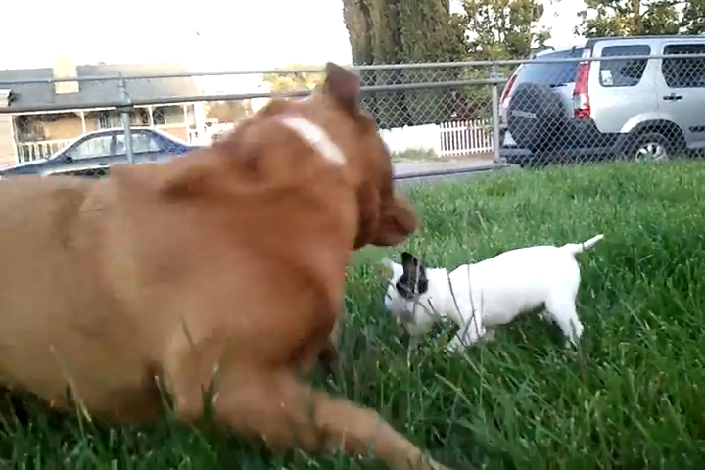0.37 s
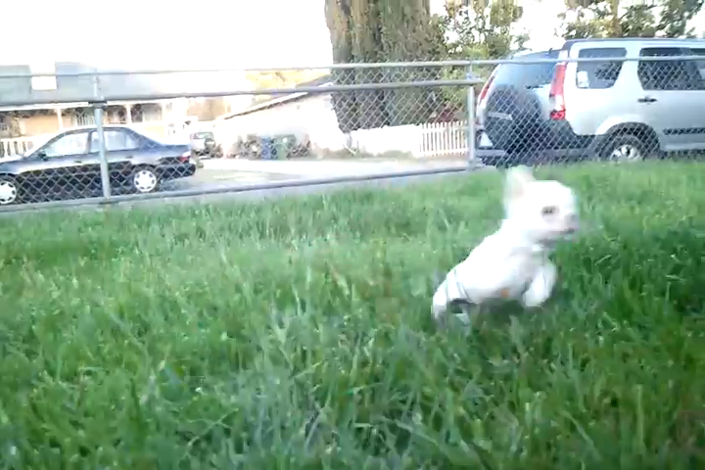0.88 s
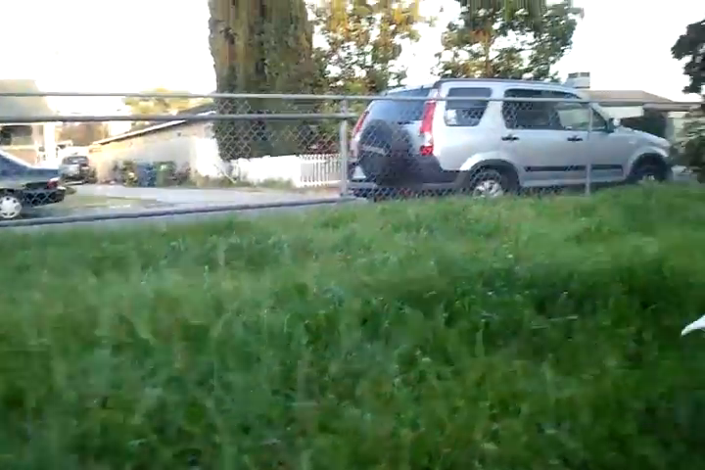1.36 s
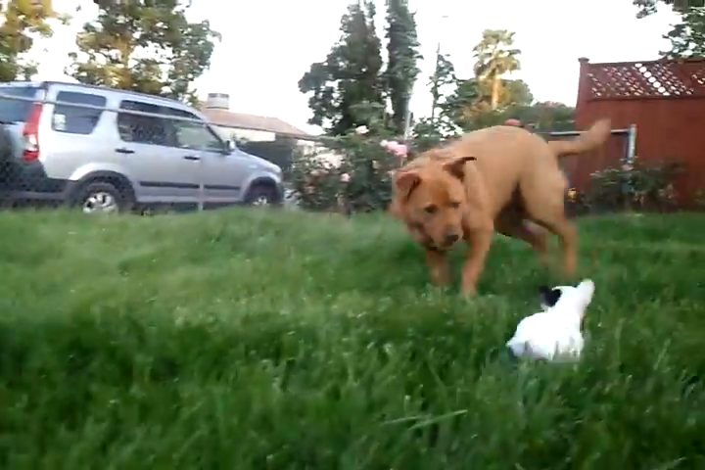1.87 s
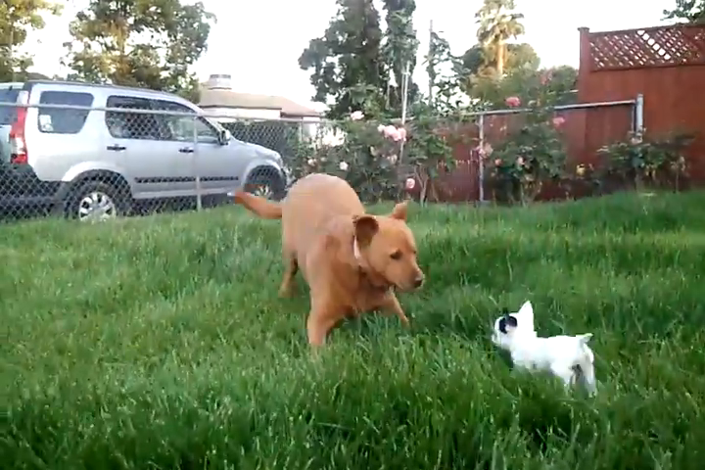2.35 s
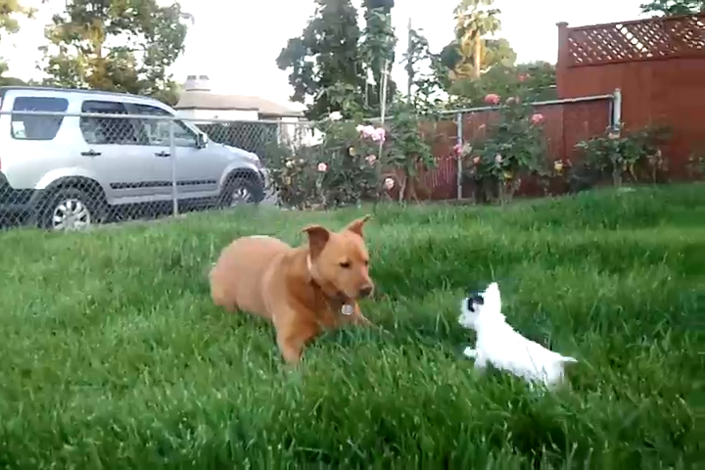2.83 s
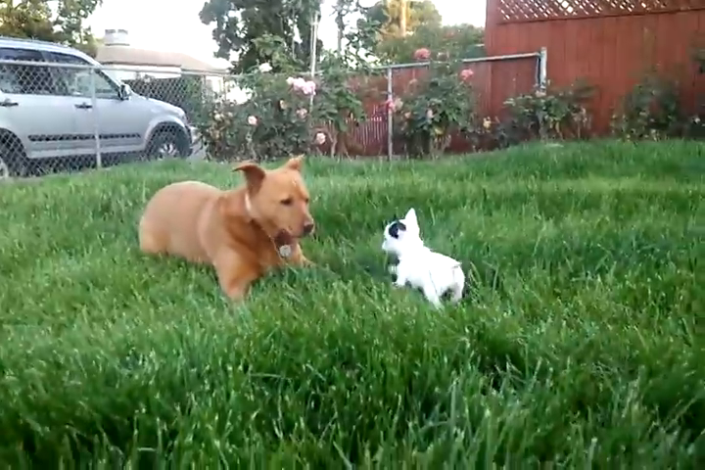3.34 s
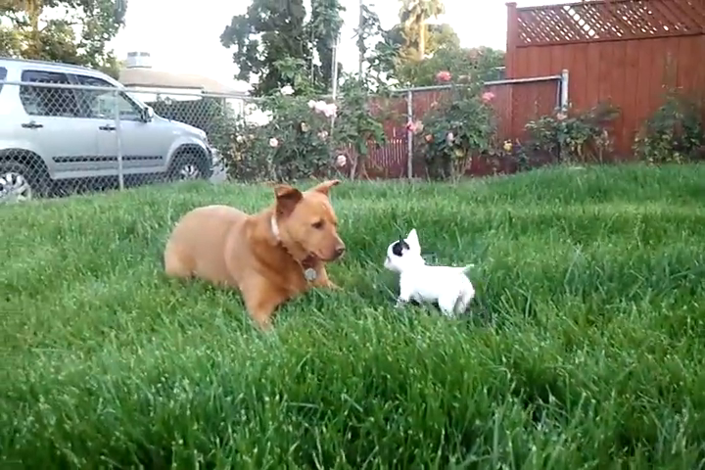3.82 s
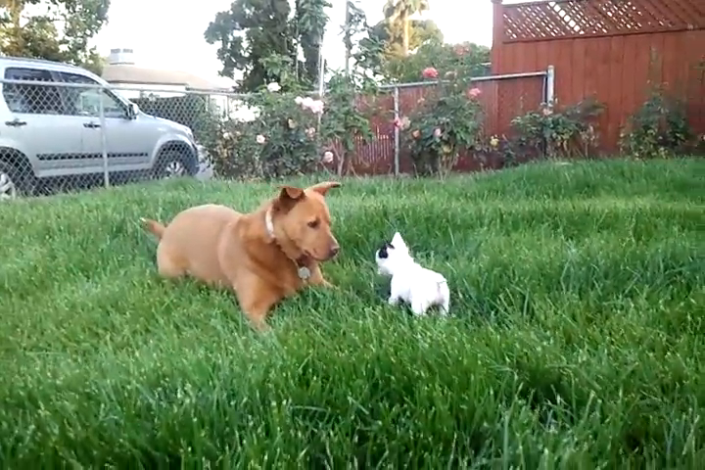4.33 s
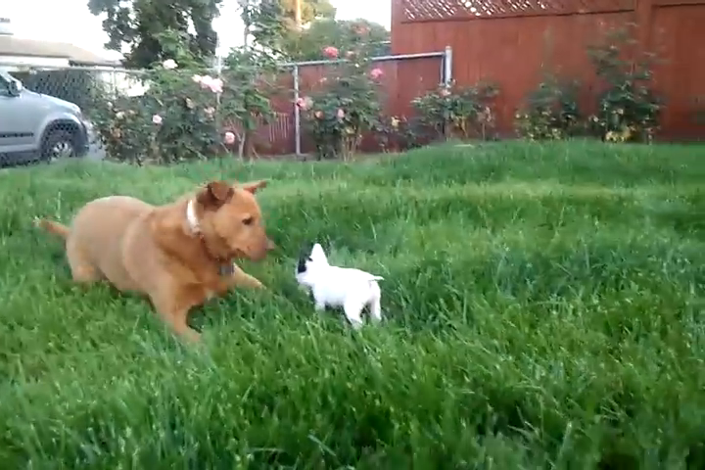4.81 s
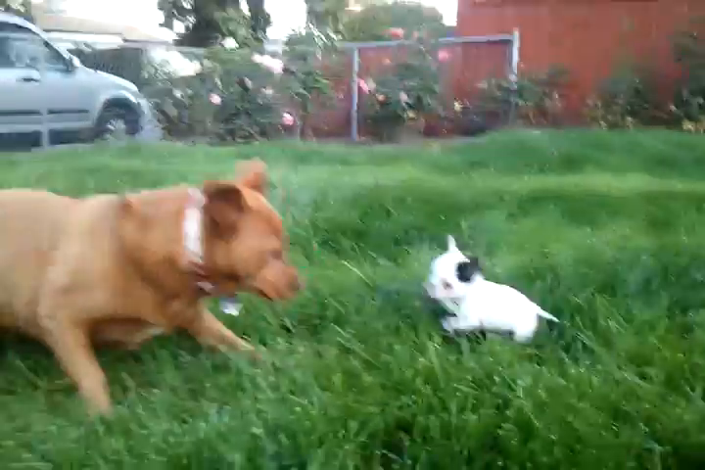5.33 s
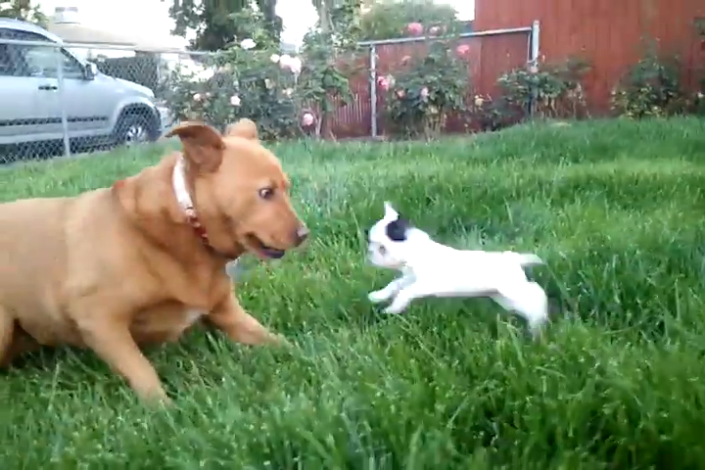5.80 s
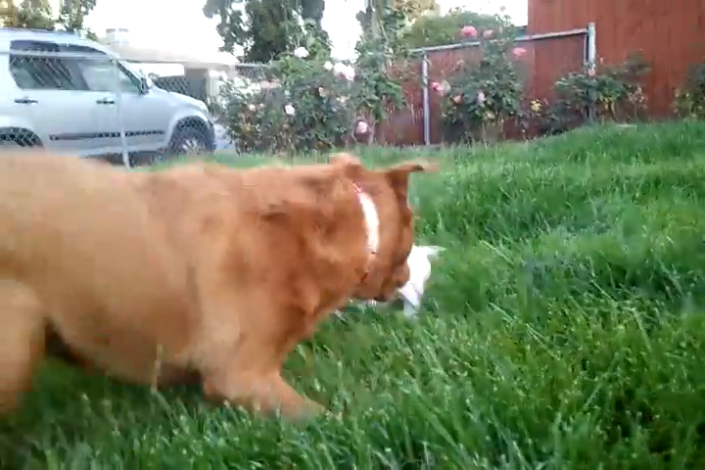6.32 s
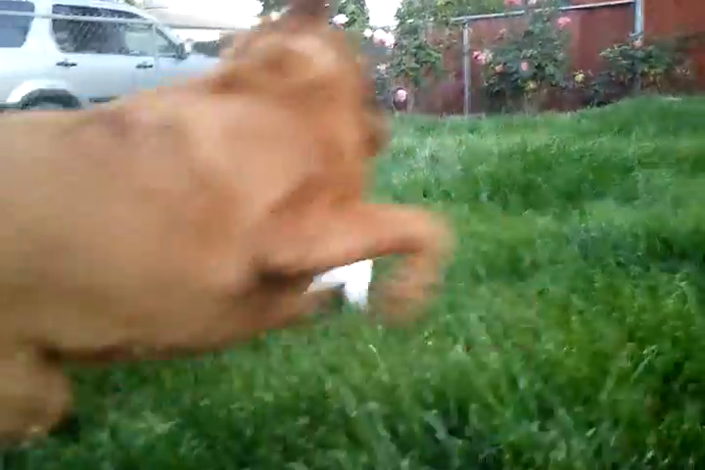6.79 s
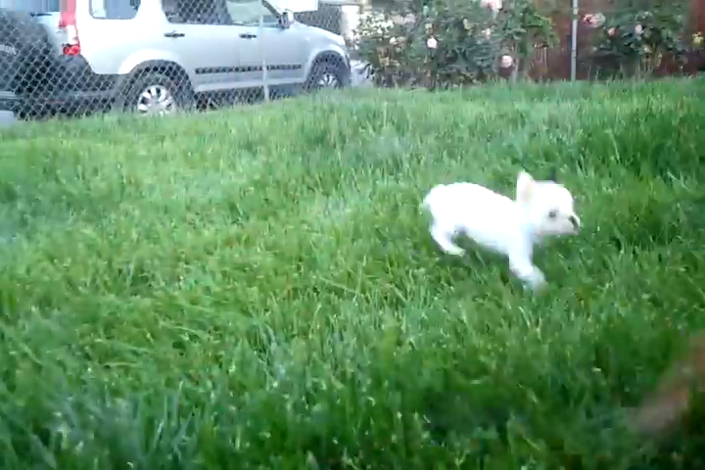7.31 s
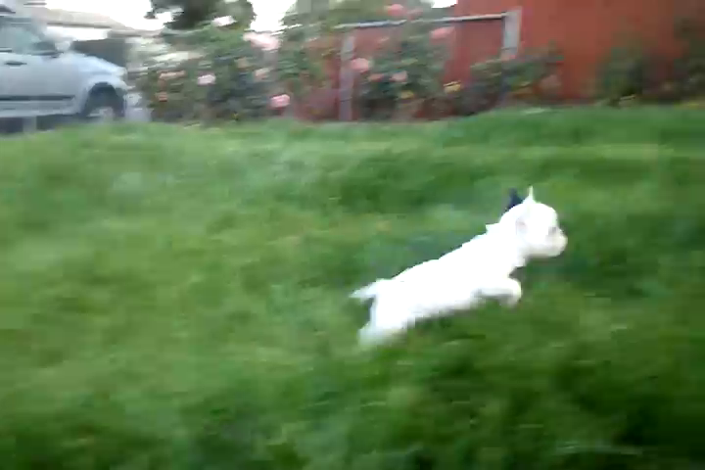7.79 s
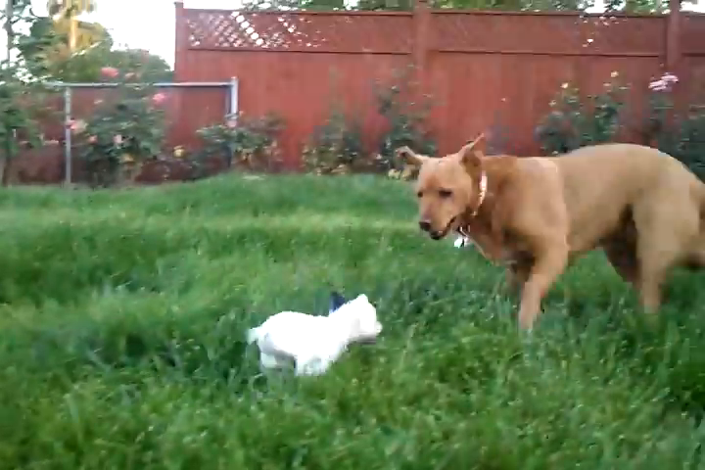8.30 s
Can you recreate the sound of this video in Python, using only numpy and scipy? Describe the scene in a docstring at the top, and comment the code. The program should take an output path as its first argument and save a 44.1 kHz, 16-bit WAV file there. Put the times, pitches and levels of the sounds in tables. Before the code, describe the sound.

Dogs romp through tall grass close to the microphone, crisp swishes and snapping stems mixed with jingling collar tags and soft paw thuds.

```python
"""Two dogs romp in tall grass close to a small microphone in a back yard.
Blades, stems and tips swish as filtered crackling noise; snapping stems and landing paws are bursts of noise.
A hollow tag knocks and metal clinks on the collar, each blow a set of decaying sine modes.
Behind them lie jolts of deep noise, hushed air, the hum of far traffic, a faint whine and one bird whistle.
"""
import sys
import numpy as np
from scipy import signal
from scipy.fft import rfft, irfft, next_fast_len
from scipy.io import wavfile
from scipy.ndimage import uniform_filter1d

SR = 44100
rng = np.random.default_rng(int(sys.argv[2]) if len(sys.argv) > 2 else 0)


def to_linear_factor(level_db):
    """Convert decibel levels (scalar or array-like) to linear amplitude factors."""
    exponent = np.asarray(level_db, float) / 20
    return 10 ** exponent


def dump_mix(stems):
    """Bounce the given channels to the path in sys.argv[1] as a 16-bit WAV at rate SR."""
    frames = np.atleast_2d(stems).T  # one column per channel
    limited = np.clip(frames, -1, 1)  # hard clip at full scale
    pcm = np.round(limited * 32767).astype(np.int16)
    wavfile.write(sys.argv[1], SR, pcm)


N = 371224

# Colour of the air noise: (frequency [Hz], relative level [dB])
AIR_COLOUR = [(250, -25), (420, -4.5), (458, -6), (488, -2.5), (2160, -6.5), (7510, -17), (8300, -21.5),
              (10800, -47), (18300, -120)]
# Colour of the far traffic: (frequency [Hz], relative level [dB])
TRAFFIC_COLOUR = [(30, -41), (60, -9), (130, 0.5), (250, -7), (400, -13), (700, -49)]
# Slow level wander of the low background noise: (time [s], level [dB])
TRAFFIC_LEVEL = [(0.0, -56), (0.3, -54.5), (0.7, -55.5), (1.17, -51.5), (1.43, -53.5), (1.78, -51),
                 (2.04, -52.5), (2.76, -50.5), (3.21, -51.5), (3.68, -50.5), (4.71, -53), (5.44, -51),
                 (6.12, -54), (7.43, -52), (7.8, -56), (8.42, -50.5)]
# Far bird: (start [s], length [s], first pitch [Hz], last pitch [Hz], level [dB])
BIRD_CHIRP = (.012, .035, 7050, 6300, -52)
# Faint fuzzy whine far off: (time [s], pitch [Hz], level before the waver [dB])
WHINE_LINE = [(5.8, 1690, -66), (5.85, 1710, -54), (5.95, 1780, -52), (6.07, 1800, -53), (6.11, 1790, -66)]
# Colour of the jolts: (frequency [Hz], relative level [dB])
JOLT_COLOUR = [(12, -8), (25, -6.5), (45, 4), (90, 0), (160, -22.5), (300, -51)]
# Jolts of the ground and the hand reaching the microphone: (peak time [s], level [dB], half length [s])
JOLTS_FELT = [(.54, -55, .1), (0.763, -48.5, .07), (.89, -48, .08), (1.17, -56.5, .1), (1.378, -56, .07),
              (1.596, -30, 0.013), (1.82, -60, 0.13), (2.4, -60, .08), (2.603, -55, 0.045),
              (2.83, -58, .07), (5.29, -54, .06), (5.65, -64, .06), (5.838, -58, .06), (6.14, -64, 0.13),
              (6.45, -62, 0.079), (6.63, -52, 0.042), (7.176, -46, 0.06), (7.43, -65, 0.11),
              (7.81, -45, .035), (7.96, -39, .04), (8.09, -48, .05), (8.255, -51.5, 0.11)]
# Paws landing: (time [s], peak level [dB], centre frequency [Hz])
PAW_THUDS = [(0.782, -18, 500), (0.809, -37, 148), (1.465, -27.5, 403), (1.581, -22, 490),
             (2.398, -44, 108), (4.425, -39, 223), (5.232, -30, 400), (5.297, -32, 101),
             (5.322, -25.5, 390), (7.808, -35, 106), (7.955, -17.5, 385), (8.083, -26.5, 417)]
# Stems snapping: (time [s], bright crack before trim [dB], duller body before trim [dB])
STEM_SNAPS = [(0.6431, -9, -40), (0.6482, -12.5, -31), (0.6725, -7, -30), (0.678, -9, -37),
              (0.8113, -3, -9.5), (0.8684, -14, -35), (0.9984, -25, -36), (1.1767, -23, -38),
              (1.4657, -17, -45), (1.5908, -18, -13.5), (1.6838, -26, -25), (2.3092, -22, -30),
              (2.36, -28, -33), (2.6209, -22, -46), (2.753, -20, -37), (2.8389, -26, -36),
              (4.4306, -52, -39), (5.2314, -30, -26), (5.277, -22, -40), (5.293, -22, -25),
              (5.3214, -29, -42), (5.36, -11, -42), (5.637, -20, -42), (5.7069, -22, -43),
              (6.1426, -13.5, -32.5), (6.4944, -7, -37), (6.618, -21, -35), (6.8687, -13, -49),
              (7.0735, -22, -40), (7.1635, -18, -27), (7.3308, -9, -38), (7.764, -25, -29),
              (7.8112, -13.5, -27), (7.9445, -15, -15), (8.159, -24, -40), (8.1817, -24, -40),
              (8.233, -17, -38), (8.3699, -25, -29)]
# Hollow tag knocking on the collar, levels before its layer gain:
# (time [s], first mode group [dB], second [dB], third [dB], main pitch [Hz])
TAG_KNOCKS = [(0.5561, -24, -30, -25, 1020), (.567, -55, -31.5, -36, 973), (.6198, -41, -37, -42, 950),
              (.732, -36, -40, -38, 940), (.7468, -26, -41, -36, 1010), (0.7827, -27, -27, -26, 950),
              (0.792, -27, -22, -31, 980), (.8093, -36, -33, -28, 914), (0.908, -49, -34, -34, 1083),
              (.9979, -55, -34, -47, 1066), (1.18, -30.5, -37, -31.5, 1043), (1.3592, -33, -39, -47, 1050),
              (1.3664, -40, -32.5, -55, 1047), (1.3984, -53, -43, -66, 1080), (1.4656, -34, -39, -51, 1070),
              (1.4984, -54, -38, -44.5, 1045), (1.5745, -46, -26, -29.5, 986),
              (1.5868, -22, -28.5, -35, 1013), (1.722, -46, -56, -38.5, 1000),
              (1.743, -42, -34.5, -48, 1010), (1.8185, -46, -40, -52, 960), (2.308, -53, -48, -42, 1040),
              (2.339, -56, -52, -40, 1010), (2.36, -60, -49, -41, 1000), (2.4014, -47, -50, -44, 990),
              (2.6221, -39.5, -58, -43.5, 1000), (2.7278, -54, -35.5, -59, 997),
              (2.753, -24, -28, -32, 1020), (2.824, -44, -42, -47, 986), (2.8402, -40, -40, -50, 980),
              (2.8864, -57, -47, -42, 990), (2.9643, -42, -45, -60, 960), (3.0287, -63, -46, -55, 995),
              (5.3561, -57, -55, -45, 1000), (5.4482, -55, -33.5, -60, 990), (5.4612, -37, -39.5, -51, 935),
              (5.602, -63, -40.5, -48, 1000), (5.7074, -43, -42.5, -35.5, 980),
              (5.9803, -56, -45.5, -53, 990), (6.1191, -54, -40, -46, 1000), (6.147, -42, -43, -34.5, 990),
              (6.226, -43, -58, -54, 1000), (6.6272, -39, -40, -39, 993), (6.7712, -42, -52, -47, 1010),
              (6.8782, -59, -46, -39, 1015), (7.2735, -57, -35, -56, 992), (7.2861, -35, -39, -36.5, 976),
              (7.5716, -59, -40.5, -45, 1090), (7.673, -63, -39, -50, 1010),
              (7.7242, -34.5, -32.5, -55, 1036), (7.7343, -38, -43, -44, 1030),
              (7.7646, -54, -45, -40, 1020), (7.7972, -56, -40, -59, 920), (7.8113, -36, -34, -28.5, 940),
              (7.9108, -42, -47, -49, 1040), (7.9252, -28, -49, -32.5, 1000),
              (7.942, -22.5, -23, -33, 1020), (7.9546, -17, -15.5, -21, 948), (7.993, -24.5, -36, -32, 980),
              (8.0839, -34.5, -34, -32.5, 1023), (8.0946, -53, -47, -32.5, 1000),
              (8.1604, -45, -36, -54, 1035), (8.1814, -39, -27, -48, 1020), (8.1914, -28.5, -28, -50, 980),
              (8.2325, -24.5, -25.5, -40, 1008), (8.2684, -60, -34.5, -43, 1030),
              (8.3833, -53, -31.5, -56, 1010), (8.394, -31.5, -36, -39, 1023)]
# How long the hollow tag swings clear of the fur: (time [s], free time [s])
KNOCK_FREE_TIME = [(0, .018), (.7, 0.012), (.75, 0.042), (.8, .015), (.9, 0.031), (1.0, 0.013),
                   (1.2, 0.034), (1.5, 0.035), (1.56, 0.015), (2.7, 0.025), (5.4, 0.024), (7.9, 0.018),
                   (8.2, 0.017), (8.27, 0.15), (8.42, 0.027)]
# Hollow tag, three groups of modes: (frequency [Hz], relative level [dB], base t60 [s])
HOLLOW_MODES = [
    [(596, -5, 0.085), (686, -8, 0.026), (784, -13.5, 0.032), (3300, -14, .07), (3260, -17.5, .07)],
    [(1000, -1.5, 0.14), (950, -12, .1), (2930, -11, 0.11)],
    [(1858, -1, 0.075), (1907, -2.5, 0.1), (2700, -17, 0.065)],
]
# Metal tag and ring clinking, levels before their layer gain:
# (time [s], first mode group [dB], third [dB], fourth [dB], time until touched again [s])
METAL_CLINKS = [(.5566, -29, -44, -23.5, 0.0084), (0.621, -51, -35, -46, .02), (.752, -50, -41, -35, .02),
                (0.7888, -29, -19.5, -27, 0.007), (0.808, -32, -16.5, -24, 0.0058),
                (.998, -36, -45, -35, 0.038), (1.173, -37, -45, -52, .008), (1.348, -49, -49, -31, .0099),
                (1.3536, -24.5, -33, -31.5, .05), (1.3638, -34, -32, -46, .079),
                (1.4645, -40, -30.5, -30, 0.034), (1.49, -34, -42, -40, 0.023),
                (1.568, -34, -48, -46, .008), (1.575, -41, -22.5, -20, 0.0048),
                (1.5901, -32, -28, -23, 0.015), (1.6088, -47, -37, -36, 0.012),
                (1.7418, -42, -56, -47, 0.01), (1.818, -29.5, -43, -44, 0.02),
                (1.834, -46, -45, -48, 0.019), (2.0964, -59, -41.5, -58, 0.03),
                (2.264, -45, -50, -42, 0.057), (2.587, -33, -46, -51, 0.038), (2.621, -53, -43, -46, .012),
                (2.727, -43, -43, -37, .017), (2.7533, -26, -35, -39, 0.019),
                (2.7762, -58, -44, -36, 0.033), (2.7884, -48, -34, -44, 0.01),
                (2.8462, -43, -49, -37.5, 0.038), (2.914, -29, -45, -50, 0.022),
                (5.233, -47, -35.5, -41, .02), (5.293, -30, -50, -55, .01), (5.3883, -45, -42, -60, 0.041),
                (5.447, -32, -38, -50, 0.022), (5.455, -60, -59, -46, 0.067), (5.5608, -39, -44, -53, .01),
                (5.6, -39, -51, -54, .009), (5.708, -48, -40, -60, 0.015), (5.88, -40.5, -52, -67, 0.022),
                (5.92, -43, -50, -64, .015), (5.9802, -39, -60, -64, 0.017), (5.985, -59, -60, -54, 0.067),
                (6.119, -46, -55, -62, .014), (6.146, -55, -38.5, -50, .08), (6.225, -36.5, -57, -57, .013),
                (6.757, -51, -43, -50, 0.022), (6.879, -39, -47, -50, .01), (7.2291, -44, -43, -32, .038),
                (7.2755, -51, -36, -47, .024), (7.283, -42, -35, -33, 0.023),
                (7.5676, -35, -32.5, -47, 0.026), (7.67, -57, -38, -34.5, 0.021),
                (7.724, -61, -35.5, -29, 0.016), (7.763, -34, -35.5, -38, .008),
                (7.793, -55, -48, -36, 0.017), (7.8182, -51, -28.5, -38, 0.016),
                (7.9117, -40, -52, -60, .01), (7.9435, -37, -25, -31, 0.024),
                (7.9556, -17.5, -32, -38, .012), (7.9642, -13, -29, -26, 0.0078),
                (7.9916, -27.5, -30, -45, .012), (8.085, -29, -38, -41, 0.027),
                (8.1574, -34.5, -40, -55, 0.0076), (8.2311, -35.5, -38, -49, .064),
                (8.2685, -36, -46, -48, .014), (8.287, -41, -41, -50, .014),
                (8.3025, -31.5, -40, -50, .013), (8.316, -33.5, -55, -51, 0.0082),
                (8.377, -37, -37, -49, 0.032)]
# Metal tag and ring, four groups of modes: (frequency [Hz], relative level [dB], base t60 [s])
METAL_MODES = [
    [(4570, -6, .08), (4625, -1, .11), (4730, -11, .05), (3950, -15, .05)],
    [(5370, -3, .1), (5780, -3, .08), (6300, -8, .08)],
    [(6820, -12, .08), (7180, 0, .28), (7285, -9, .12), (8890, -3, .25)],
    [(7825, -1, .25), (8175, -2, .25)],
]
# Colours of blades, heavy stems and fine tips: (frequency [Hz], relative level [dB])
BLADE_COLOUR = [(1500, -11.5), (2200, -7.5), (3000, -4.5), (4300, -2.5), (5200, -4), (6200, -7),
                (7500, -49)]
STEM_COLOUR = [(30, -27), (100, -7), (300, 2.5), (900, 3), (1500, 2.5), (2400, -2), (3500, -33)]
TIP_COLOUR = [(3500, -25.5), (5000, -7), (6000, -3), (7100, 0.5), (8000, -5.5), (9300, -8.5)]
# Restless stirring of the grass between strokes, before the layer gains:
# (time [s], level [dB], heavy stems relative [dB], fine tips relative [dB])
GRASS_STIR = [(0, -64, -2, 0), (.385, -73, -4, 3), (.4, -47, -14, -1), (.6, -46.5, -8.5, 5.5),
              (1.0, -47, -5, 5), (1.5, -50, -2, 7), (1.8, -51.5, -0.5, 6), (2.14, -52.5, -5.5, -4.5),
              (2.7, -53.5, -2.5, 1.5), (3.1, -57, -0.5, 6), (3.4, -58.5, -0.5, -3), (4.6, -71, 6.5, 3),
              (4.85, -59.5, 0, -6.5), (5.4, -55.5, -3, 0), (5.96, -57.5, -0.5, -0.5),
              (6.3, -47.5, -14.5, -6), (7.03, -49, -10.5, -2.5), (7.9, -51, 1, 3), (8.05, -44, -5, 1),
              (8.42, -49.5, -1.5, 0.5)]
# Legs and bodies sweeping through the grass, before the layer gains:
# (peak time [s], level [dB], rise [s], fall [s], fine tips relative [dB])
GRASS_STROKES = [(.42, -49.5, 0.015, .05, 4), (.5, -36, 0.067, 0.051, 1), (.615, -39.5, 0.063, 0.058, -6),
                 (.725, -34.5, 0.047, 0.037, 3.5), (.79, -28, 0.032, 0.055, 2),
                 (0.872, -27.5, 0.03, 0.047, 5), (1.067, -35.5, 0.041, 0.068, 6.5),
                 (1.36, -45.5, 0.033, 0.018, -1), (1.585, -32.5, 0.016, 0.022, 1),
                 (1.64, -41.5, .04, 0.16, 1.5), (1.83, -43.5, .04, 0.025, 2), (2.02, -47, 0.16, 0.17, 0.5),
                 (2.22, -47.5, 0.051, 0.29, -1), (2.37, -44.5, .03, 0.071, 1),
                 (2.59, -48, 0.065, 0.042, -5), (2.9, -46.5, 0.19, 0.13, 1.5),
                 (4.85, -57.5, 0.044, 0.1, -2), (4.95, -46, 0.032, 0.21, -3),
                 (5.1, -44, 0.045, 0.068, -3.5), (5.16, -40, 0.036, 0.094, -1),
                 (5.235, -39.5, 0.049, 0.034, -5), (5.29, -37, 0.036, 0.098, 1),
                 (5.62, -43.5, .17, .14, -1), (6.151, -41.5, 0.087, 0.13, -2.5),
                 (6.5, -37, .12, 0.084, 1.5), (6.67, -45.5, 0.11, 0.055, 5.5),
                 (6.84, -41.5, 0.15, 0.11, 2.5), (7.172, -26, 0.066, 0.073, 1),
                 (7.31, -43.5, 0.028, 0.12, 6.5), (7.47, -35.5, 0.043, 0.097, 4),
                 (7.66, -47, 0.048, 0.063, 9), (7.81, -47, 0.085, 0.037, 9), (7.97, -29.5, 0.036, 0.027, 2),
                 (8.19, -49, .05, .03, 0), (8.38, -38.5, .05, 0.05, -6.5)]
# Treble edge of a small recorder: (frequency [Hz], gain [dB])
RECORDER_EDGE = [(8000, 0), (8400, -7.5), (8900, -25), (9200, -51.5), (9500, -61), (9700, -100)]

STEP = 64  # samples between the points of a coarse level curve


def evened(x):
    """Scales to rms 1."""
    return x / np.sqrt(np.mean(x ** 2) + 1e-20)


def read_spectrum(points, hz):
    """Reads a spectrum in dB on a log-frequency axis."""
    point_hz, db = np.transpose(points)
    return np.interp(np.log(hz + 1), np.log(point_hz + 1), db)


def filtered(x, points):
    """Shapes a signal by a spectrum, padded to a fast transform length."""
    size = next_fast_len(N)
    gain = to_linear_factor(read_spectrum(points, np.fft.rfftfreq(size, 1 / SR)))
    return irfft(rfft(x, size) * gain, size)[..., :N]


def colour(x, points):
    """Shapes a signal by a spectrum and scales it to rms 1."""
    return evened(filtered(x, points))


def add(mix, s, sound):
    """Mixes a sound in at time s."""
    part = mix[round(s * SR):][:len(sound)]
    part += sound[:len(part)]


def flutter(size, depth_db):
    """Random gain wavering by depth_db rms; noise smoothed twice over size samples."""
    smooth = uniform_filter1d(uniform_filter1d(rng.standard_normal(N), size), size)
    return to_linear_factor(depth_db * evened(smooth))


def swell(s, db, rise, fall):
    """Coarse power curve that climbs to its peak at s and sinks again, the front blunter than the tail."""
    t = np.arange(0, N + STEP, STEP) / SR - s
    distance = abs(t / np.where(t < 0, rise, fall))
    roundness = np.where(t < 0, 1.49, 1.33)
    edge_db = -10  # one rise or fall away from the peak
    return to_linear_factor(db + edge_db * distance ** roundness) ** 2


def gain_per_sample(power):
    """Turns a coarse power curve into gain at every sample."""
    return np.interp(np.arange(N), STEP * np.arange(len(power)), np.sqrt(power))


def puff(noise, low_hz, high_hz, t60):
    """A click and its dying spray of noise in one band, peak 1."""
    push = noise * to_linear_factor(-60 * np.arange(len(noise)) / SR / t60)
    push[0] += 3.0  # the click
    band = signal.butter(2, [low_hz, high_hz], "band", fs=SR, output="sos")
    sound = signal.sosfilt(band, push)
    return sound / abs(sound).max()


def yard_air():
    """Smooth noise of the open air, wavering slowly."""
    return to_linear_factor(-54) * colour(rng.standard_normal(N), AIR_COLOUR) * flutter(size=6000, depth_db=1.4)


def traffic():
    """Far traffic as a low noise hum whose level wanders slowly."""
    level_db = np.interp(np.arange(N) / SR, *np.transpose(TRAFFIC_LEVEL))
    return to_linear_factor(level_db) * colour(rng.standard_normal(N), TRAFFIC_COLOUR)


def bird():
    """One short whistle, a sine whose pitch falls ever faster."""
    s, length, from_hz, to_hz, db = BIRD_CHIRP
    u = np.arange(0, length, 1 / SR) / length
    hz = from_hz + (to_hz - from_hz) * u ** 2
    envelope = np.sqrt(np.sin(np.pi * u))
    out = np.zeros(N)
    add(out, s, to_linear_factor(db) * envelope * np.sin(2 * np.pi * np.cumsum(hz) / SR))
    return out


def whine():
    """A gliding sine made fuzzy by a fast random waver of its level."""
    s, hz, db = np.transpose(WHINE_LINE)
    t = np.arange(s[0], s[-1], 1 / SR)
    waver = 1 + .45 * evened(uniform_filter1d(rng.standard_normal(len(t)), 300))
    tone = np.sin(2 * np.pi * np.cumsum(np.interp(t, s, hz)) / SR)
    out = np.zeros(N)
    add(out, s[0], to_linear_factor(np.interp(t, s, db)) * waver * tone)
    return out


def shake():
    """Lumpy deep noise: jolts over the tremor of a hand that is never quite still."""
    jolts = gain_per_sample(sum(swell(s, db, half, half) for s, db, half in JOLTS_FELT))
    tremor = to_linear_factor(-73.5) * flutter(size=3000, depth_db=0.5)
    return (jolts + tremor) * colour(rng.standard_normal(N), JOLT_COLOUR)


def thuds():
    """Soft ground under a paw gives a low puff with no ring."""
    out = np.zeros(N)
    for (s, db, hz), noise in zip(PAW_THUDS, rng.standard_normal((len(PAW_THUDS), 4000))):
        add(out, s, to_linear_factor(db) * puff(noise, hz / 1.77, hz * 1.65, t60=0.038))
    return out


def snaps():
    """Each snapping stem is a bright crack over a duller, longer body."""
    out = np.zeros(N)
    noises = rng.standard_normal((len(STEM_SNAPS), 2, 1500))
    for (s, crack_db, body_db), (crack_noise, body_noise) in zip(STEM_SNAPS, noises):
        crack = to_linear_factor(crack_db - 3.5) * puff(crack_noise, 2300, 8600, t60=.007)
        body = to_linear_factor(body_db + 3.5) * puff(body_noise, 270, 2300, t60=0.022)
        add(out, s, crack + body)
    return out


def ring(group_db, stretch, length, groups, draw):
    """One blow starts every mode, the tag chatters against its neighbour, and the next touch chokes it."""
    t = np.arange(6000)[:, None] / SR
    hz, db, t60 = np.concatenate(groups).T
    sizes = [len(group) for group in groups]
    side, luck, detune, chatter_rate, chatter_phase = draw
    # a tag left alone for long is also damped and rattled less
    freedom = np.clip(length / 0.031, .6, 3) ** 0.55
    level_db = db + np.repeat(group_db, sizes) + 8 * (luck - .5)
    decay_db = -60 * t / (t60 * freedom)
    choke_db = -60 * np.maximum(t - length, 0) / 0.021
    chatter_hz = 40 + 120 * chatter_rate
    chatter = 1 + 0.35 / freedom * np.sin(2 * np.pi * (chatter_hz * t + chatter_phase))
    pitch = hz * np.repeat(stretch, sizes) * (1 + .006 * (detune - .5))
    modes = np.sign(side - .5) * np.sin(2 * np.pi * pitch * t)  # every mode leaves rest at the blow
    return (chatter * to_linear_factor(level_db + decay_db + choke_db) * modes).sum(1)


def blow_draws(count, groups):
    """Five random numbers for each mode of each blow."""
    return rng.random((count, 5, len(np.concatenate(groups))))


def rattle(count):
    """Light random touches of both tags, as strong as the dogs are restless."""
    out, groups = np.zeros(N), HOLLOW_MODES + METAL_MODES
    s, level_db = np.transpose(GRASS_STIR)[:2]
    rows = rng.random((count, 3 + len(groups)))
    for row, draw in zip(rows, blow_draws(count, groups)):
        at = row[0] * N / SR
        group_db = np.interp(at, s, level_db) + 7 - 24 * row[3:]  # uneven between groups
        stretch = [1, 1.1 + 0.083 * row[1]] + [1] * (len(groups) - 2)
        length = .008 + .025 * row[2]
        add(out, at, ring(group_db, stretch, length, groups, draw)[:3000])
    return out


def clinks():
    """Metal tag and ring: the stiff metal keeps its pitch, and each blow adds a bright contact tick."""
    out, count = np.zeros(N), len(METAL_CLINKS)
    draws, ticks = blow_draws(count, METAL_MODES), rng.standard_normal((count, 1500))
    for (s, first_db, *upper_db, length), draw, tick in zip(METAL_CLINKS, draws, ticks):
        top_db = max(first_db, *upper_db)
        second_db = top_db - 7.5 + 10 * (draw[0, 0] - .5)  # follows the loudest of the other groups
        group_db = [first_db, second_db, *upper_db]
        add(out, s, ring(group_db, np.ones(len(METAL_MODES)), length, METAL_MODES, draw))
        add(out, s, to_linear_factor(top_db + 2.5) * puff(tick, 2300, 8000, t60=0.0041))
    return out


def knocks():
    """The collar's hold bends the hollow tag's main pitch; it rings until the next knock or the fur damps it."""
    out, count = np.zeros(N), len(TAG_KNOCKS)
    reference_hz = 1000  # reference pitch of the tag's main mode
    times = np.transpose(TAG_KNOCKS)[0]
    until_next = np.diff(times, append=N / SR + 1)
    lengths = np.minimum(until_next, np.interp(times, *np.transpose(KNOCK_FREE_TIME)))
    draws, ticks = blow_draws(count, HOLLOW_MODES), rng.standard_normal((count, 1500))
    for (s, *group_db, hz), length, draw, tick in zip(TAG_KNOCKS, lengths, draws, ticks):
        add(out, s, ring(group_db, [1, hz / reference_hz, 1], length, HOLLOW_MODES, draw))
        add(out, s, to_linear_factor(max(group_db) - 7) * puff(tick, 230, 1800, t60=0.011))  # contact tick
    return out


def crackle(per_s, spread_db, hiss):
    """Tiny blade contacts at random moments, a few large, over a smooth hiss."""
    size = to_linear_factor(spread_db * np.minimum(rng.exponential(1, N), 5))
    contacts = size * (rng.random(N) < per_s / SR)
    return evened(contacts * rng.standard_normal(N)) + hiss * rng.standard_normal(N)


def grass():
    """Blades, heavy stems and fine tips follow the stirring and the strokes, wavering as clumps let go."""
    s, *columns = np.transpose(GRASS_STIR)
    t = np.arange(0, N + STEP, STEP) / SR
    level_db, stems_db, tips_db = (np.interp(t, s, column) for column in columns)
    strokes = np.array([swell(*row[:4]) for row in GRASS_STROKES])
    stroke_tips_db = np.transpose(GRASS_STROKES)[4]
    # doubled decibels give power
    blade_power = to_linear_factor(2 * level_db) + strokes.sum(0)
    stem_power = to_linear_factor(2 * (level_db + stems_db)) + to_linear_factor(2 * -11) * strokes.sum(0)
    tip_power = to_linear_factor(2 * (level_db + tips_db)) + to_linear_factor(2 * stroke_tips_db) @ strokes
    blades = to_linear_factor(3) * gain_per_sample(blade_power) * colour(crackle(3000, 3.3, 2.5), BLADE_COLOUR)
    stems = to_linear_factor(4.5) * gain_per_sample(stem_power) * colour(crackle(1500, 4.2, 1.76), STEM_COLOUR)
    tips = to_linear_factor(5.5) * gain_per_sample(tip_power) * colour(crackle(3000, 3.0, 1.2), TIP_COLOUR)
    waver = flutter(size=500, depth_db=1.13) * flutter(size=120, depth_db=0.48)
    return waver * (blades + stems + tips)


def scene():
    """Everything at one spot on the lawn, in one channel."""
    tags = to_linear_factor(4.5) * knocks() + to_linear_factor(1.5) * clinks() + rattle(count=90)
    swish = grass()
    background = yard_air() + traffic() + shake() + whine() + bird()
    return (swish + background + tags + snaps() + thuds())[None]


def band_limit(x):
    """A steep low-pass at the top of the band."""
    return signal.sosfilt(signal.butter(12, 9560, fs=SR, output="sos"), x)


def record(dry):
    """The input stage softly rounds off peaks, then the small recorder cuts the treble."""
    overload = .9  # level at which the rounding saturates
    rounded = overload * np.tanh(dry / overload)
    return band_limit(filtered(rounded, RECORDER_EDGE))


dry = scene()
out = record(dry)
dump_mix(out)
```